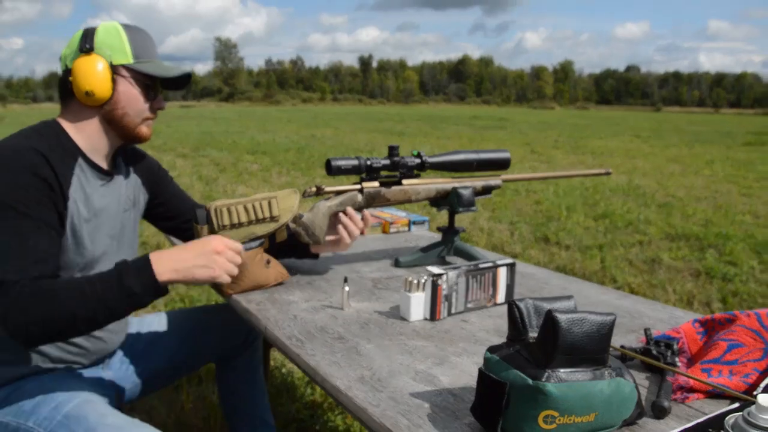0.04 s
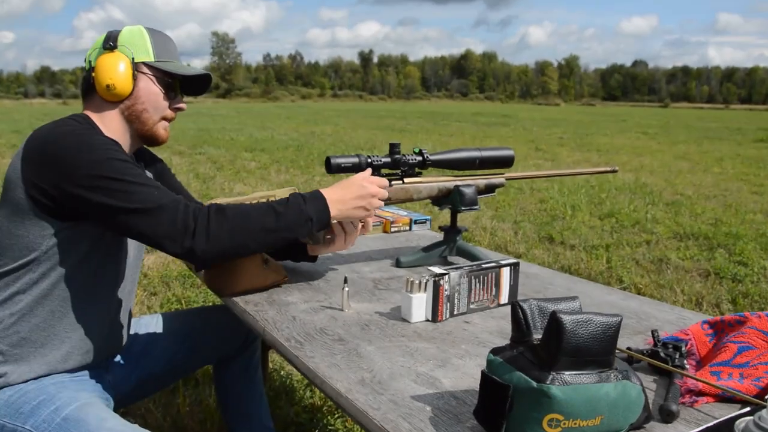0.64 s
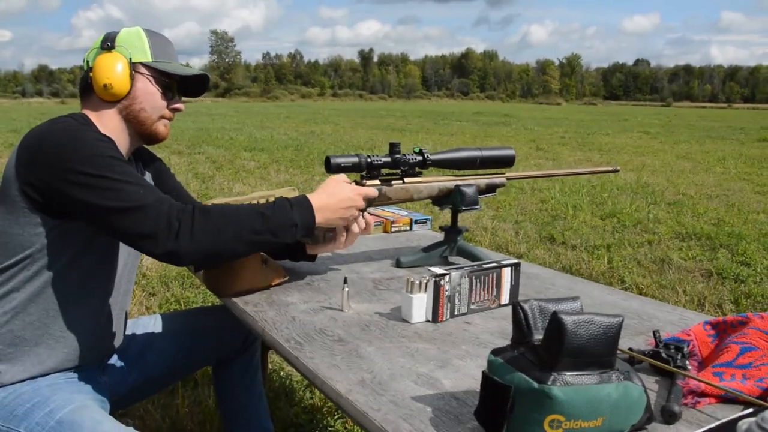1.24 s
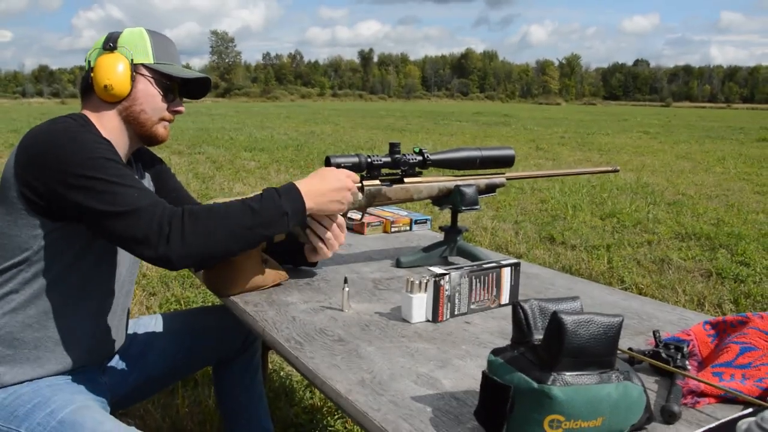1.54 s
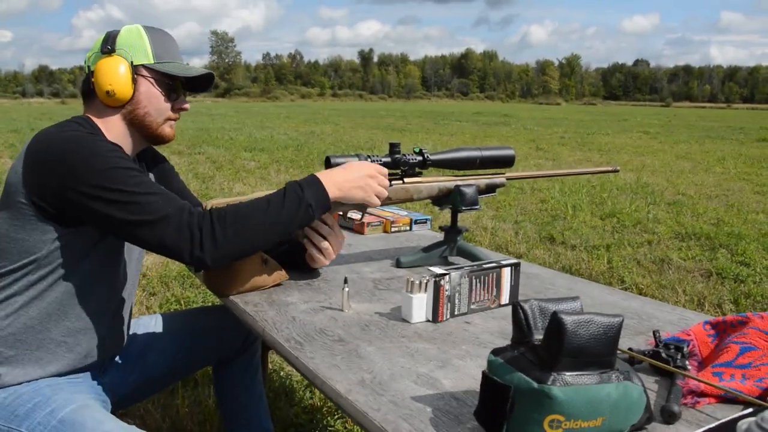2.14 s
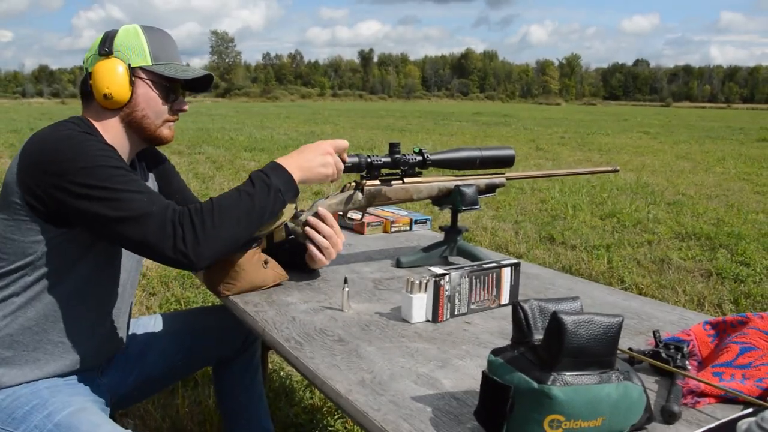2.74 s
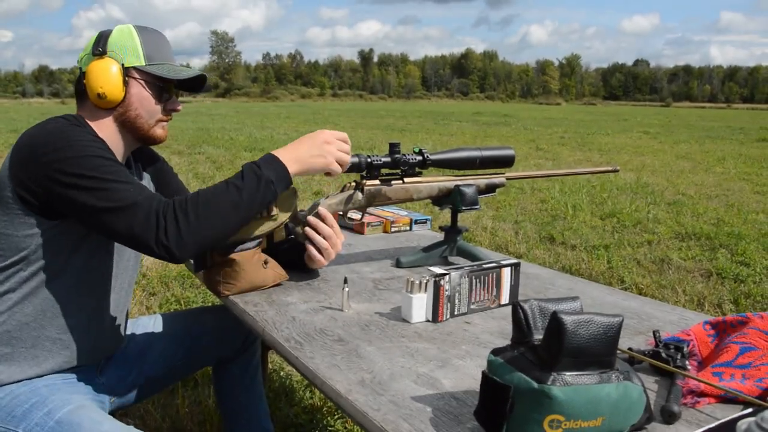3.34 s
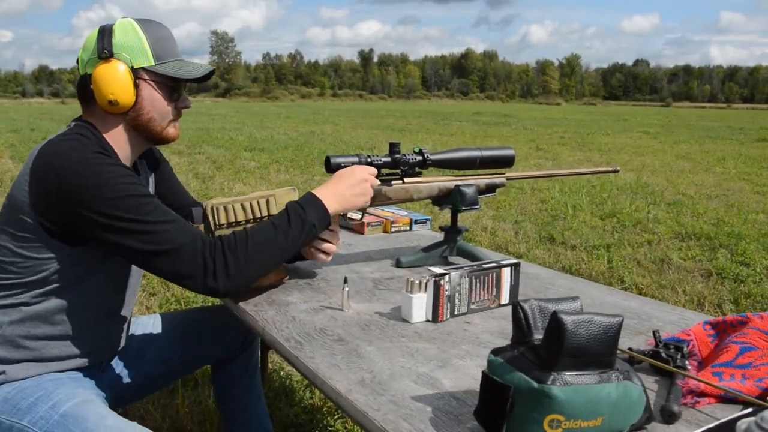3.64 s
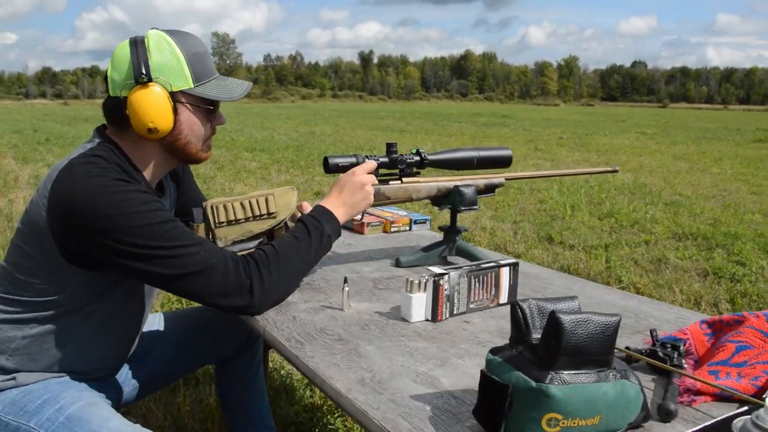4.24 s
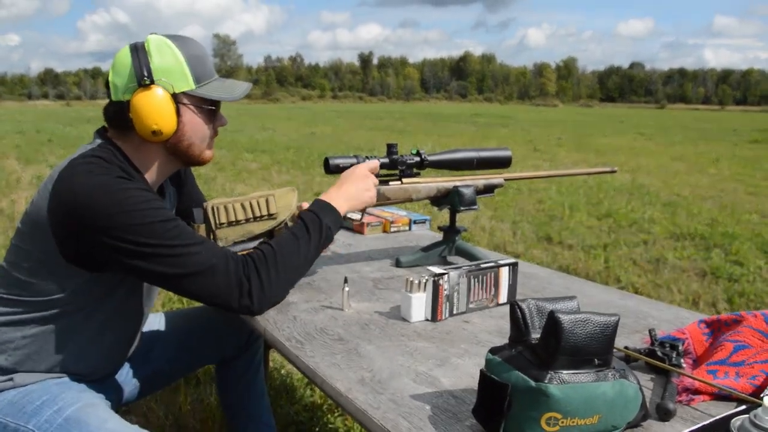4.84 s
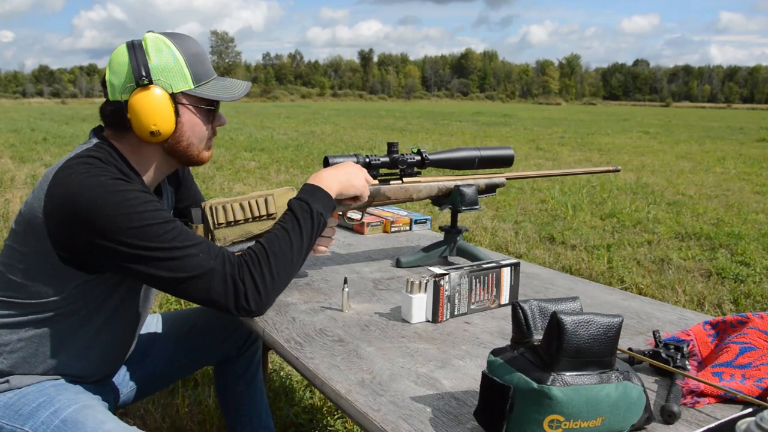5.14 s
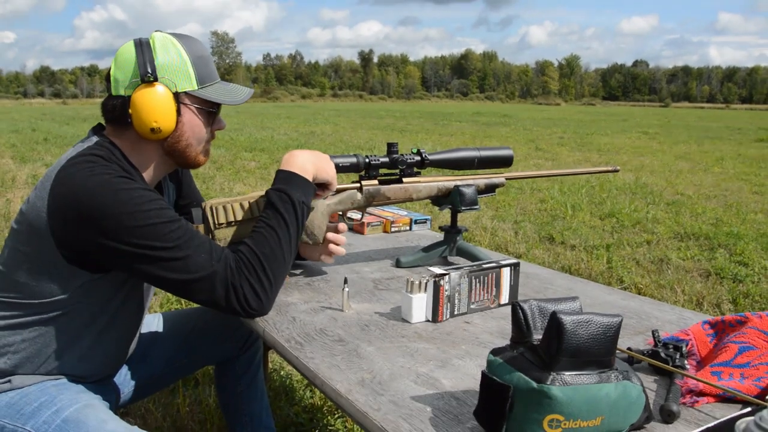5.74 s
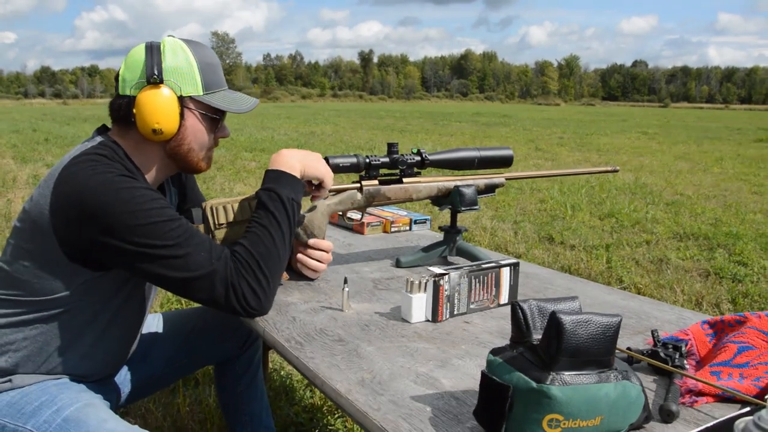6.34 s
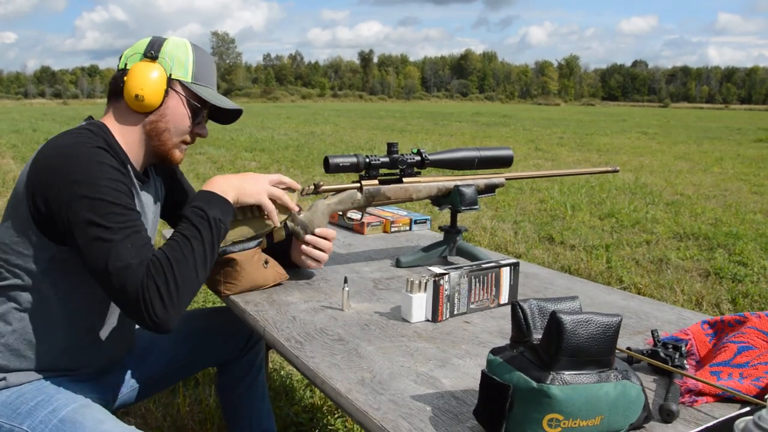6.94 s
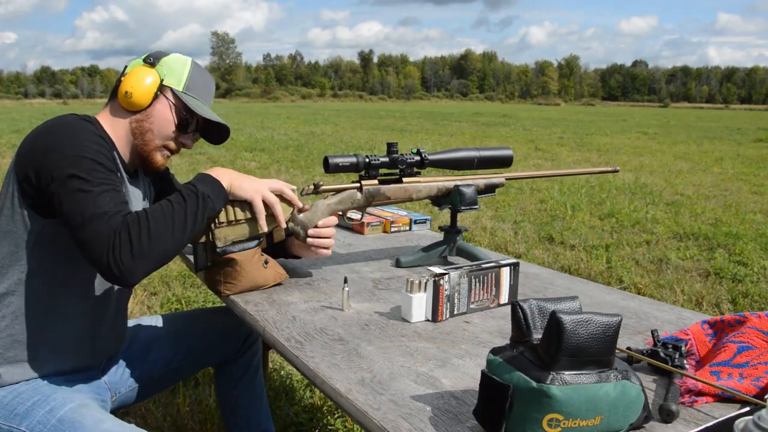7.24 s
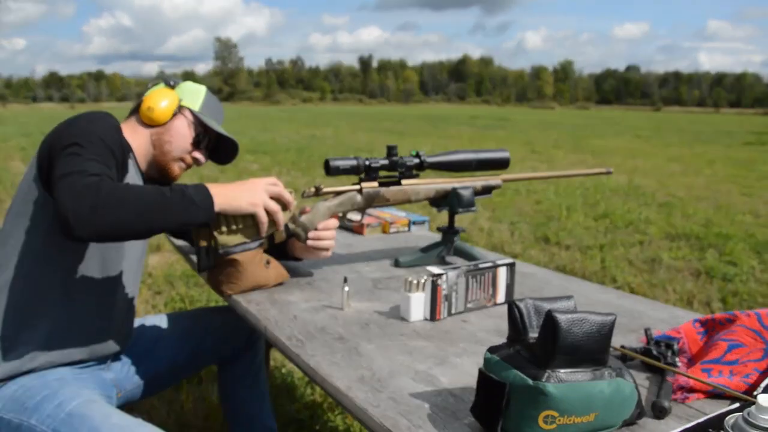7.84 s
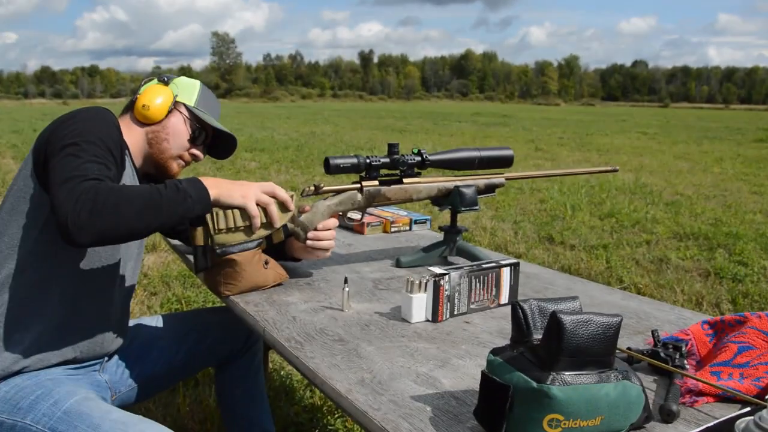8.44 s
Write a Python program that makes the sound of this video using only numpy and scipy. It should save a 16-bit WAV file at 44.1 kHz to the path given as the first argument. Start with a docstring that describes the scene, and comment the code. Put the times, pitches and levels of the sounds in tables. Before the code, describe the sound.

Faint insects trill in a meadow while a bolt-action rifle is cycled, clicks on an empty chamber, and is shifted with small taps.

```python
"""A bolt-action rifle is worked on an outdoor bench. From the start, crickets trill and chirp in the meadow
and a breeze rumbles on the microphone over a faint hum. The bolt slides and locks, steel on steel, and
at 1 s the striker snaps on an empty chamber. By 2 s the bolt is cycled again, setting the barrel ringing.
From 3.6 s the rifle is handled: small taps, a juddering slide, soft bumps on the rests. From 6 s a
katydid (a bush cricket) lisps, and near the end a hand makes one tiny squeak."""
import sys
import numpy as np
from scipy import signal
from scipy.fft import rfft, irfft, next_fast_len
from scipy.io import wavfile
from scipy.ndimage import uniform_filter1d, map_coordinates

SR = 44100
rng = np.random.default_rng(int(sys.argv[2]) if len(sys.argv) > 2 else 0)


def transcribe(signal):
    """Save signal, clipped to [-1, 1], as a 16-bit WAV file at the path in sys.argv[1]."""
    frames = np.atleast_2d(signal).T
    limited = np.clip(frames, -1, 1)
    pcm = np.round(limited * 32767).astype(np.int16)
    wavfile.write(sys.argv[1], SR, pcm)


N = 373968


def amp(db):
    """Turn decibels (dB) into a number to multiply by."""
    return 10 ** (np.asarray(db) / 20)


def unit(x):
    """Scale a sound to an average strength (rms) of 1."""
    return x / np.sqrt(np.mean(x ** 2) + 1e-20)


def clock(seconds):
    """The time of every sample in a stretch this long."""
    return np.arange(int(seconds * SR)) / SR


def curve(rows):
    """Join (time, value) points with straight lines, one value per sample."""
    times, values = np.transpose(rows)
    return np.interp(np.arange(N) / SR, times, values)


def wobble(rate):
    """A smooth random curve through `rate` new values a second."""
    points = rng.standard_normal(int(N * rate / SR) + 4)
    return map_coordinates(points, [np.arange(N) * rate / SR])


def add(track, start, sound):
    """Mix a sound into the track, `start` seconds in."""
    part = track[max(round(start * SR), 0):][:len(sound)]
    part += sound[:len(part)]


def tone(pitch):
    """A pure tone that follows a changing pitch in Hz."""
    return np.sin(2 * np.pi * np.cumsum(pitch) / SR)


def filtered(x, response):
    """Turn each frequency f in x up or down by response(f)."""
    n = x.shape[-1]
    padded = next_fast_len(n + SR // 10)
    return irfft(rfft(x, padded) * response(np.fft.rfftfreq(padded, 1 / SR)), padded)[..., :n]


def resonate(x, modes):
    """Let x shake an object with these resonances, the pitches it likes to ring at."""
    def response(f):
        return sum((-1) ** k * amp(db) * 1j * f * width / (hz * hz - f * f + 1j * f * width)
                   for k, (hz, width, db) in enumerate(modes))
    return filtered(x, response)


def noise(colour):
    """Noise of strength 1, shaped by (Hz, dB) points."""
    hz, db = np.transpose(colour)
    white = rng.standard_normal(N)
    return unit(filtered(white, lambda f: amp(np.interp(np.log(f + 1), np.log(hz), db))))


def narrow_hiss(hz, width):
    """Noise of strength 1 gathered around one pitch."""
    return unit(filtered(rng.standard_normal(N), lambda f: 1 / (1 + ((f - hz) * 2 / width) ** 2)))


# The colours of the open air and the breeze. Each row: frequency in Hz, relative level in dB.
AIR_COLOUR = [(20, -14), (60, -1), (150, 4), (300, -3), (600, -0.5), (950, 3), (1400, -2), (2000, -7.5),
              (3000, -11), (6500, -12), (15000, -12.5), (16000, -15.5)]
BREEZE_COLOUR = [(15, -9), (35, -2.5), (55, -0.5), (80, -4.5), (120, -16), (250, -32), (800, -49.5)]
# How the breeze rises and falls. Each row: time in seconds, relative level in dB.
GUSTS = [(0.0, -58), (0.26, -60), (0.35, -51), (0.66, -67), (1.06, -61.5), (1.37, -76), (2.08, -55),
         (2.29, -61), (2.34, -51), (3.28, -79), (4.86, -69), (5.88, -76), (6.78, -68.5), (7.06, -53.5),
         (7.18, -58.5), (7.44, -49.5), (8.46, -53), (8.48, -61)]
# The tones of the hum. Each row: pitch in Hz, level in dB.
HUM_TONES = [(59.2, -62.5), (118.4, -66)]


def outdoors():
    """The open field murmurs, a breeze buffets the microphone, and two low tones hum."""
    t = np.arange(N) / SR
    breeze = amp(curve(GUSTS) + 5) * unit(noise(BREEZE_COLOUR) * amp(wobble(25)))
    hum = sum(amp(db) * np.sqrt(2) * np.sin(2 * np.pi * hz * t) for hz, db in HUM_TONES)
    air = amp(-57 + 0.59 * wobble(1.64)) * noise(AIR_COLOUR)
    return air + breeze + hum


def tree_cricket(hz, strokes_per_s, fall, db):
    """An unbroken trill of wing strokes, each sagging in pitch."""
    strokes = np.cumsum(strokes_per_s * (1 + 0.0058 * wobble(3.05))) / SR
    progress = strokes % 1
    pitch = hz * (1 + fall * (.5 - progress) + 0.00402 * wobble(150))
    return amp(db + wobble(28)) * unit(np.sin(np.pi * progress) ** 2 * tone(pitch))


def far_katydid(hz, width, lisps_per_s, db):
    """A far katydid lisps faintly at a nearly even pace."""
    turns = np.cumsum(lisps_per_s * (1 + .1 * wobble(1))) / SR
    return amp(db) * narrow_hiss(hz, width) * np.sin(np.pi * turns) ** 6


# The nearer katydid's lisps. Each entry: start in seconds.
LISP_STARTS = [6.11, 6.43, 6.75, 7.02, 7.52, 8.11, 8.42]


def near_katydid(hz, width, db):
    """Each lisp is a short swell of high hiss."""
    out, hiss = np.zeros(N), narrow_hiss(hz, width)
    swell = np.hanning(int(.09 * SR)) ** .5
    for start in LISP_STARTS:
        piece = np.roll(hiss, -round(start * SR))[:len(swell)]
        add(out, start, amp(db) * swell * piece)
    return out


def cricket(starts, hz, db, spacing_s, strokes):
    """Each chirp is a few falling wing strokes, blurred by the grass; pitch and level vary a little."""
    out, t = np.zeros(N), clock(0.023)
    progress = t / t[-1]
    for start in starts:
        chirp_hz, chirp_db = hz * (1 + rng.normal(0, .006)), db + rng.normal(0, 1)
        for k in range(strokes):
            flutter = .016 * unit(uniform_filter1d(rng.standard_normal(len(t)), size=60))
            pitch = chirp_hz * (1 + 0.022 * (.5 - progress) + flutter)
            stroke = unit(np.sin(np.pi * progress) * tone(pitch))
            add(out, start + k * spacing_s, amp(chirp_db) * stroke)
    return out


# Distant insects blend into bands of hiss. Each row: pitch in Hz, width in Hz, level in dB.
FAR_CHORUS = [(3866, 140, -71.5), (3610, 300, -73.5), (4186, 240, -68.5), (5120, 680, -66.5),
              (8600, 1000, -78)]
# The chirps of a high, slow cricket and of a lower, quick one. Each entry: start in seconds.
HIGH_CHIRP_STARTS = [.25, .92, 2.09, 2.386, 4.315, 4.91, 6.134, 6.66, 6.924, 7.37, 8.405]
LOW_CHIRP_STARTS = [1.299, 2.182, 3.26, 3.72, 4.48, 4.95, 5.93, 6.62, 7.32, 7.73, 8.201]


def insects():
    """The meadow: a far chorus, one steady trill, two chirping crickets and two katydids."""
    out = sum(amp(db + 1.2 * wobble(5.8)) * narrow_hiss(hz, width) for hz, width, db in FAR_CHORUS)
    out += tree_cricket(hz=4110, strokes_per_s=59.7, fall=0.039, db=-62.5)
    out += cricket(HIGH_CHIRP_STARTS, hz=5510, db=-64.5, spacing_s=.036, strokes=2)
    out += cricket(LOW_CHIRP_STARTS, hz=5350, db=-64.5, spacing_s=.019, strokes=4)
    out += far_katydid(hz=8750, width=500, lisps_per_s=3.2, db=-72)
    return out + near_katydid(hz=9220, width=450, db=-66)


# How busy the hands are. Each row: time in seconds, relative level in dB.
HAND_ACTIVITY = [(0.0, -60.5), (0.47, -58), (0.61, -61), (1.39, -62), (1.6, -59), (2.57, -65), (3.4, -65.5),
                 (4.01, -62), (4.23, -55), (4.49, -56), (4.65, -61), (5.17, -61), (5.55, -57), (5.86, -64),
                 (6.16, -66), (7.32, -61), (7.7, -58), (8.48, -60)]
# The dull colour of rubbing cloth. Each row: frequency in Hz, relative level in dB.
CLOTH_COLOUR = [(60, -27), (125, -6.5), (200, -3.5), (290, -1.5), (420, -11.5), (700, -14), (1200, -18.5),
                (4000, -21), (12000, -50)]


def cloth_rub():
    """Sleeves and stock rub on bench and sandbag, swelling when the hands are busy."""
    busy_db = curve(HAND_ACTIVITY)
    rub_db = busy_db + 1 + .3 * (busy_db - busy_db.mean())
    return amp(rub_db) * unit(noise(CLOTH_COLOUR) * amp(3.1 * wobble(35)))


def ticks(count=20, scatter_db=2):
    """Fingers and fittings tick at random, more often and louder the busier the hands are."""
    out, busy_db = np.zeros(N), curve(HAND_ACTIVITY)
    effort = np.cumsum(amp(busy_db) ** 2)
    for k, (place, size) in enumerate(rng.random((count, 2))):
        at = np.searchsorted(effort, effort[-1] * (k + place) / count)  # one tick per share of effort
        db = busy_db[at] + scatter_db * (2 * size - 1)
        add(out, at / SR, amp(db) * steel_hit(bright_db=-8, weight_db=-10, fade_s=.02))
    return out


# One squeak. In order: start in seconds, pitch in Hz, level in dB, length in seconds.
HAND_SQUEAK = (8.149, 6010, -55, .033)


def squeak():
    """A brief, unsteady squeak under the hand."""
    out = np.zeros(N)
    start, hz, db, length = HAND_SQUEAK
    swell = np.hanning(int(length * SR))
    pitch = hz * (1 + .012 * wobble(400)[:len(swell)])
    add(out, start, amp(db) * unit(swell * tone(pitch)))
    return out


# The borders of four bands, low to high: thud, knock, clack, crack. Each entry: frequency in Hz.
BAND_EDGES = [90, 450, 1600, 4800, 15900]
THUD, KNOCK, CLACK, CRACK = range(4)


def band(x, which):
    """Keep only one of the four bands."""
    return signal.sosfilt(signal.butter(3, BAND_EDGES[which:which + 2], "band", fs=SR, output="sos"), x)


def unit_hit(x):
    """Give a short sound the energy of 10 milliseconds at strength 1."""
    return x / np.sqrt(np.sum(x ** 2) / (SR / 100) + 1e-20)


def chatter(t, fade_s, tail_db, tail_fade_s):
    """The force of a hit: a burst of tiny rebounds, then a weak rattle of loose parts."""
    fade = amp(-60 * t / fade_s) * (1 - np.exp(-t / 0.00024))
    spectrum = rfft(rng.standard_normal(len(t)) * fade)
    size = np.abs(spectrum)
    # hard steel on steel spreads its force evenly over all frequencies
    evened = spectrum * 1.45 * size.mean() / (size + 0.39 * size.mean())
    burst = irfft(evened, len(t)) * amp(-15 * t / fade_s)
    rattle = amp(tail_db - 60 * t / tail_fade_s) * rng.standard_normal(len(t))
    return burst + rattle


# Resonances of the rifle's works and stock. Each row: pitch in Hz, width in Hz, relative level in dB.
BODY_MODES = [(128.8, 21.5, 19.5), (238.3, 51, -26), (284, 41, -7.5), (480, 46, -2), (625, 43, -4.5),
              (935, 330, -0.5), (1223, 96, 7.5), (1651, 79, 2), (1938, 107, 0.5), (2433, 384, 3),
              (2852, 156, 6.5), (3250, 320, 3), (4006, 260, 3), (4376, 205, 1), (5250, 300, -5),
              (5624, 170, -3.5), (6830, 900, -11.5), (8240, 590, -10.5), (10080, 900, -14.5),
              (12400, 550, -15), (14600, 350, -17)]


def body_hit(bands_db, fade_s):
    """One hit shakes the rifle's body in four bands; the thud lasts longest, the crack shortest."""
    t, out = clock(.25), 0
    # each spot that is struck favours different resonances
    modes = [(hz, width, db + 1.85 * rng.standard_normal()) for hz, width, db in BODY_MODES]
    top_hz = 15100 * amp(bands_db[CRACK] - bands_db[CLACK])  # a softer hit loses more treble
    for which, stretch in enumerate([1.96, 1.08, 1.13, 0.84]):
        force = chatter(t, fade_s * stretch, tail_db=-27, tail_fade_s=0.11)
        softened = filtered(force, lambda f: 1 / (1 + 1j * f / top_hz))
        out = out + amp(bands_db[which]) * unit_hit(band(resonate(softened, modes), which))
    return out


def steel_hit(bright_db, weight_db, fade_s):
    """Steel meets steel: hardness gives the crack, the weight behind it the thud and knock."""
    knock_db = 2 + 0.4 * weight_db
    return body_hit([weight_db, knock_db, 0, bright_db], fade_s)


def ring(t, modes):
    """Struck metal rings with fading tones, their strengths a little different each time."""
    tones = 0
    for hz, db, fade_s in modes:
        fade = amp(db + rng.normal(0, 1) - 60 * t / fade_s)
        tones = tones + fade * np.sin(2 * np.pi * (hz * t + rng.random()))
    return tones * (1 - np.exp(-t / 0.00074))


# Tones of the barrel and its steel housing. Each row: pitch in Hz, relative level in dB,
# seconds to fade by 60 dB.
BARREL_TONES = [(114, -9.5, 0.17), (655, 6.5, 0.12), (3695, 12, 0.11), (3913, 8, .06), (6140, -9, 0.09),
                (8350, -20, .1)]
# The barrel's twin bending tones. In order: pitch in Hz, gap to the twin in Hz, relative level in dB,
# the twin's dB compared with the first, seconds to fade by 60 dB.
BARREL_PING = (1757.5, 17.5, -2.5, -6, 0.56)


def barrel(t):
    """The barrel bends in two directions at nearly one pitch, so its ping dips and swells again."""
    hz, gap_hz, db, twin_db, fade_s = BARREL_PING
    ping = np.sin(2 * np.pi * hz * t) + amp(twin_db) * np.sin(2 * np.pi * (hz + gap_hz) * t)
    return ring(t, BARREL_TONES) + amp(db - 60 * t / fade_s) * ping


# The stock's bumps. Each row: start in seconds, thud level in dB, rattle in dB compared with the thud.
STOCK_BUMPS = [(1.465, -45, -1), (3.978, -50.5, -9), (4.269, -52, -6), (4.3054, -48, -5.5),
               (4.432, -48, -12), (4.5207, -42.5, -8.5), (4.6117, -36, -13), (5.435, -40.5, -8),
               (5.5514, -36.5, -9), (5.639, -47.5, -16), (8.151, -43, -4.5), (8.233, -37, -18),
               (8.268, -33, -15)]


def bumps():
    """The stock settles on sandbag and bench with soft thuds that rattle its fittings."""
    out, t = np.zeros(N), clock(.5)
    for start, db, rattle_db in STOCK_BUMPS:
        add(out, start, amp(db) * body_hit([0, rattle_db - 5, rattle_db, rattle_db - 7.5], fade_s=0.028))
        add(out, start, amp(db + rattle_db - 19) * barrel(t))
    return out


# Resonances that a slipping part stirs. Each row: pitch in Hz, width in Hz, relative level in dB.
SLIP_MODES = [(151, 26, 7.5), (573, 260, 1.5), (1140, 320, -1.5), (1810, 180, 0), (2330, 300, -1.5),
              (2920, 200, 2), (3520, 180, -2), (4060, 390, -6.5), (8450, 4000, -24.5)]


def judder(start=4.068, db=-36.5, slips_per_s=276.6):
    """A tight part sticks and slips under one push: each slip sways the rifle and lets out a scrape."""
    t = np.arange(N) / SR - start
    rise_s, hold_s, release_s = .045, .08, .028
    push = np.interp(t, np.cumsum([0, rise_s, hold_s, release_s]), [0, 1, 1, 0])
    rate = slips_per_s * (1 - .25 * (1 - push)) * (1 + 0.05 * wobble(200))  # slower under less push
    turns = np.cumsum(rate) / SR
    sway = unit(np.sin(2 * np.pi * turns) + .17 * np.sin(4 * np.pi * turns))
    slips = rng.standard_normal(N) * np.exp(-(turns % 1) / .4) * amp(1.5 * wobble(250))
    scrape = unit(resonate(slips, SLIP_MODES))
    return amp(db) * push * (amp(-2) * sway + amp(-4.5) * scrape)


# Sliding strokes. Each row: start in seconds, end in seconds, scrape level in dB.
SLIDES = [(0.385, 0.538, -53.5), (0.542, 0.581, -34), (1.413, 1.506, -49.5), (1.552, 1.625, -54.5),
          (1.61, 1.664, -41), (1.814, 1.953, -54.5), (1.969, 2.002, -32), (5.176, 5.296, -46.5),
          (5.282, 5.364, -57), (5.383, 5.497, -47.5), (7.044, 7.091, -52), (7.7, 7.82, -58),
          (7.964, 8.012, -58.5), (8.124, 8.18, -50.5), (8.176, 8.285, -57)]


def sliding(light_stroke_db=-43):
    """Rough surfaces catch on each other and shake the rifle's body; hard strokes are brighter."""
    t, out = np.arange(N) / SR, np.zeros(N)
    catches = rng.standard_normal(N) * amp(3.5 * wobble(260) + 1.5 * wobble(40))
    sharp_modes = [(1160, 94, -24), (1779, 21, 6.0), (3600, 30, -0.5)]
    grit = resonate(catches, BODY_MODES) + resonate(catches, sharp_modes)
    rub = unit(band(grit, KNOCK))
    scrape = unit(band(grit, CLACK) + 0.58 * band(grit, CRACK))
    for start, end, db in SLIDES:
        on = (t > start) & (t < end)
        press = np.clip(np.minimum((t[on] - start) / 0.021, (end - t[on]) / 0.0033), 0, 1)
        rub_db = .5 - 0.58 * max(db - light_stroke_db, 0)  # the dull rub lags behind in hard strokes
        out[on] += amp(db) * press * (amp(rub_db) * rub[on] + scrape[on])
    return out


# The striker's fall. In order: start in seconds, relative level in dB, rough fade time in seconds.
STRIKER_FALL = (1.0088, -20.5, 0.019)
# Resonances of its snap. Each row: pitch in Hz, width in Hz, relative level in dB.
SNAP_MODES = [(696, 520, -16), (1286, 144, 4), (2700, 460, -4), (3680, 300, -1.5), (4380, 190, -5),
              (5700, 250, 0.5), (6940, 300, -6), (7660, 480, -4.5), (9550, 250, -10), (10900, 620, -10.5),
              (12500, 400, -16), (13460, 200, -5)]


def striker():
    """The striker falls on an empty chamber: one dry, bright snap that rings mostly the higher tones."""
    out, t = np.zeros(N), clock(.5)
    start, db, fade_s = STRIKER_FALL
    force = chatter(t, fade_s, tail_db=-32.5, tail_fade_s=.12)
    add(out, start, amp(db + 4) * unit_hit(resonate(force, SNAP_MODES)))
    add(out, start, amp(db - 22) * ring(t, BARREL_TONES[2:]) + amp(db - 29.5) * barrel(t))
    return out


# Tones of the bolt handle. Each row: pitch in Hz, relative level in dB, seconds to fade by 60 dB.
HANDLE_TONES = [(4322, 1.5, .125), (4585, -15, .14), (405, -21, .12)]
# The bolt slams against its stop. Each row: start in seconds, level in dB, then the dB added to that
# level for brightness (crack), weight (thud), barrel ring and handle ring.
BOLT_SLAMS = [(0.5788, -15.5, -2, -26, -23, -18), (1.6477, -21.5, 3, -9, -18, -24),
              (2.002, -14, -1.5, -28, -17, -10.5)]
# Lighter steel clicks. Each row: start in seconds, level in dB, the dB added for brightness and for
# weight, rough fade time in seconds.
STEEL_CLICKS = [(0.3925, -43, -6.5, -9, .03), (.421, -48, -5, 0.5, .012), (0.5342, -36, -5, -16, .009),
                (0.5358, -25, -1.5, -20, .021), (.5555, -32.5, -9, -22, .01), (0.562, -39, 5, -11, .01),
                (0.8045, -54, -1.5, -2, .018), (0.9555, -51, -3, -8, 0.018),
                (1.3818, -28, -7.5, -37, 0.018), (1.3872, -37, -6, -14.5, 0.024),
                (1.4431, -40.5, -11, -9, 0.056), (1.4858, -38, -2.5, -12, 0.015),
                (1.512, -46, -8, -7, 0.027), (1.668, -41.5, 0, 3.5, 0.05), (1.828, -43, -6, -1.5, 0.041),
                (1.962, -27, -12, -30, .017), (1.9646, -26.5, -0.5, -19, 0.023),
                (3.599, -34, -6, -37, 0.021), (3.605, -42, -6, -22, .013), (3.6974, -42, -13, -13.5, .026),
                (3.8538, -43.5, -16, -10.5, 0.032), (3.897, -57.5, -14, -8, 0.027),
                (4.8079, -34, -19, -22, 0.018), (4.98, -51, -15, -9, 0.016), (5.014, -53, -17, -8, 0.016),
                (5.182, -39.5, -13, -30, 0.0098), (5.2605, -32.5, -7, -15, 0.048),
                (5.3934, -50, -7, 0, .015), (5.465, -43.5, 4.5, -6, 0.018), (5.8505, -55, -6, -16, .028),
                (7.076, -56, -12, 7.5, 0.037), (7.87, -52.5, 2.5, -8, .025)]


def bolt():
    """The bolt's slams set barrel and handle ringing; the lighter clicks barely stir them."""
    out, t = np.zeros(N), clock(1)
    for start, db, bright_db, weight_db, barrel_db, handle_db in BOLT_SLAMS:
        add(out, start, amp(db) * steel_hit(bright_db, weight_db, fade_s=.031))
        add(out, start, amp(db + barrel_db) * barrel(t) + amp(db + handle_db) * ring(t, HANDLE_TONES))
    for start, db, bright_db, weight_db, fade_s in STEEL_CLICKS:
        add(out, start, amp(db) * steel_hit(bright_db, weight_db, fade_s))
        add(out, start, amp(db - 22) * barrel(t) + amp(db - 36) * ring(t, HANDLE_TONES))
    return out


def scene():
    """Everything comes from the front; only a trace of hiss differs between the ears."""
    rifle = bolt() + striker() + bumps() + ticks() + sliding() + judder()
    middle = rifle + cloth_rub() + squeak() + insects() + outdoors()
    side = amp(-65) * noise([(30, -4.0), (300, -1), (1500, -6.5), (15000, -5)])
    return np.array([middle + side, middle - side])


def record(dry):
    """Flatten any peak beyond full scale, then remove everything above 16000 Hz."""
    return filtered(np.clip(dry, -1, 1), lambda hz: hz < 16000)


dry = scene()
out = record(dry)
transcribe(out)
```